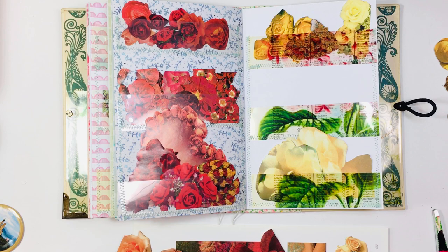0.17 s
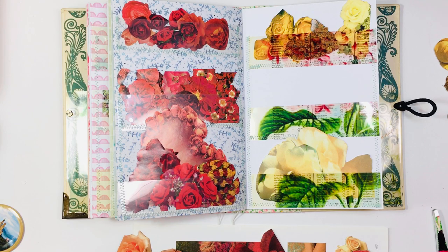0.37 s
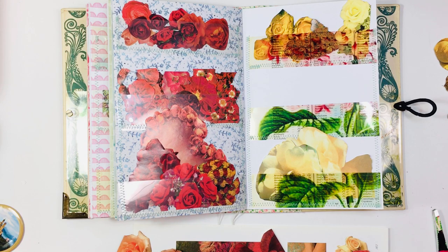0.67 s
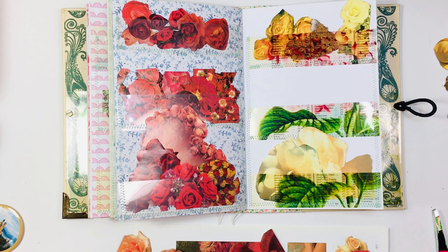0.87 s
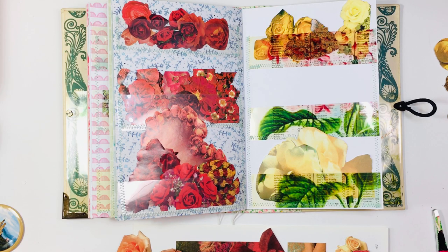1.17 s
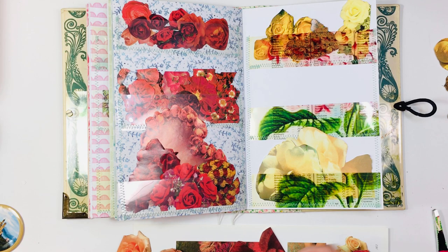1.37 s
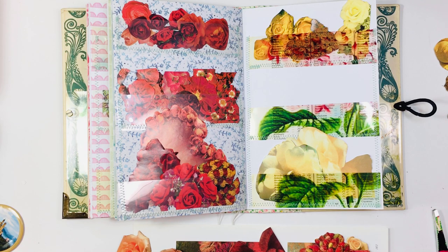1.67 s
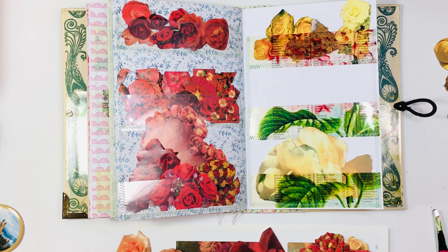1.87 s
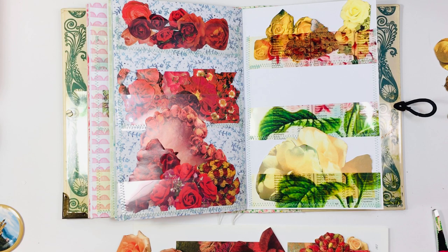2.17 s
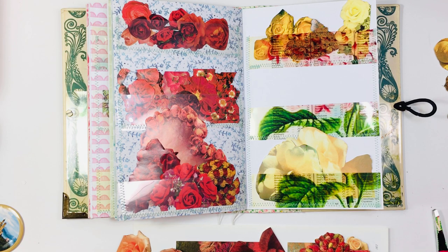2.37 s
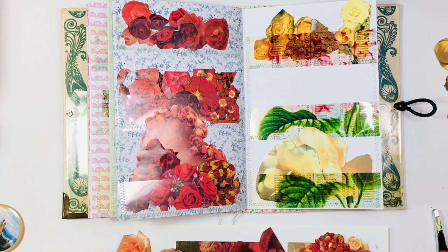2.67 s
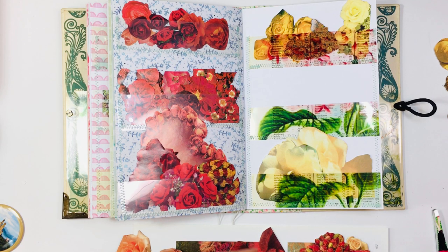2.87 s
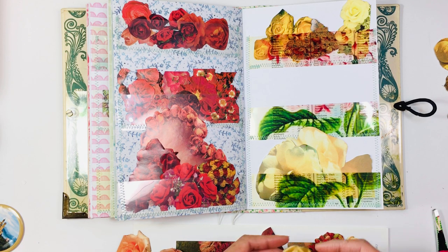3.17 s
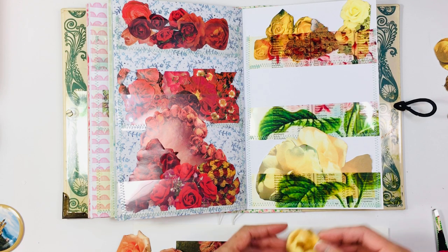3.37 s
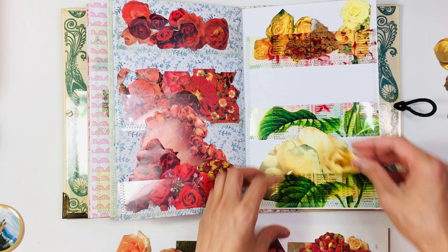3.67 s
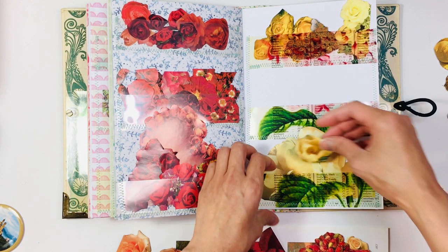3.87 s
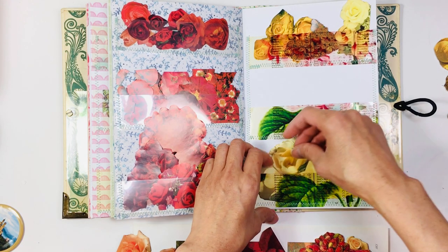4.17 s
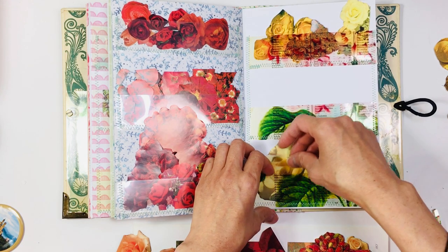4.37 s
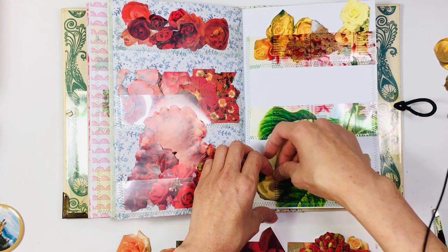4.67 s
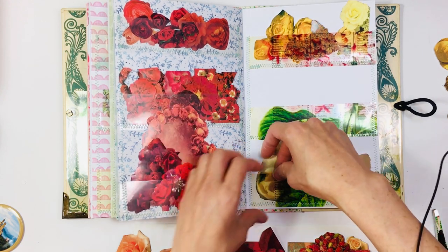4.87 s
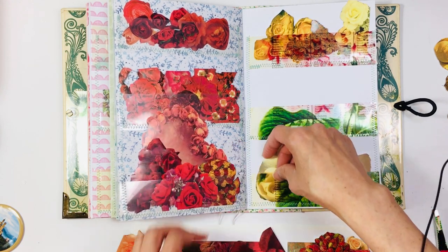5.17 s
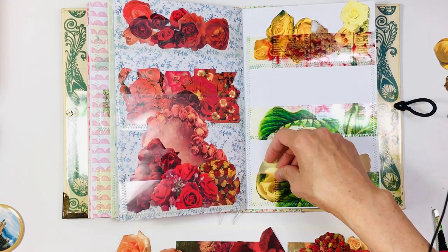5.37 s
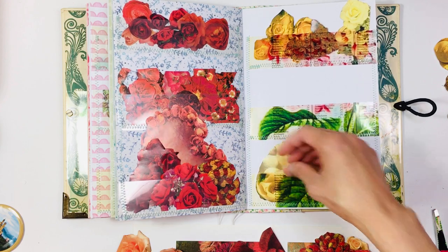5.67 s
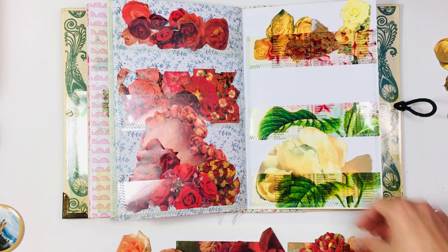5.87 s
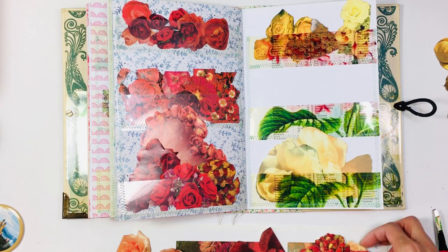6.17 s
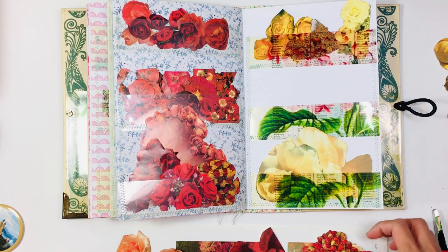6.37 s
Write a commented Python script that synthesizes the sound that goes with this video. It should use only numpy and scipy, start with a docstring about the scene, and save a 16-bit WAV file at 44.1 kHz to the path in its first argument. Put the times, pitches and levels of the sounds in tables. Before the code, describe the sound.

Close, dry rustling of thin paper sliding in short strokes, small sharp ticks, soft finger rubs and a plastic snap over faint low hum.

```python
"""Sliding paper hisses in fine grains close to the microphone: cut-outs glide over a table and into a clear pocket.
Each push shapes a shower of tiny random clicks over smooth noise; rubbing fingers are darker noise of the same kind.
Short noise bursts make scuffs and rustles, single ticks make crackles, damped sine waves make taps and sharp rings,
and gliding bands of noise colour some slides and scuffs. The pocket snaps once, as a noise crack with ringing tones.
A quiet room rumbles and hums underneath: shaped noise and two wavering tones."""
import sys
import numpy as np
from scipy import signal
from scipy.fft import rfft, irfft
from scipy.io import wavfile
from scipy.ndimage import uniform_filter1d

SR = 44100
rng = np.random.default_rng(int(sys.argv[2]) if len(sys.argv) > 2 else 0)


def wrap_up_sound(samples):
    """Save the sound to the file named by the first command line argument, as 16-bit audio."""
    columns = np.atleast_2d(samples).T
    # keep every value between -1 and 1, then stretch to whole-number steps
    tamed = np.clip(columns, -1, 1)
    steps = np.round(tamed * 32767).astype(np.int16)
    wavfile.write(sys.argv[1], SR, steps)


N = 287001
TIME = np.arange(N) / SR  # seconds
HIT = 4096  # samples in one short sound


def undb(db):
    """Turn decibels into a gain."""
    return 10 ** (np.asarray(db) / 20)


def unit(x, length=None):
    """Scale to an average strength (rms) of 1, spreading the energy over the given number of samples."""
    return x / np.sqrt(np.sum(x ** 2) / (length or x.size) + 1e-30)


def curves(table):
    """Draw straight lines between the rows of a time table, one value per sample."""
    times, *columns = np.transpose(table)
    return [np.interp(TIME, times, column) for column in columns]


def add(out, start_s, x):
    """Mix a short sound in at its start time."""
    first = max(int(start_s * SR), 0)
    out[first:first + len(x)] += x[:len(out) - first]


def bins(n):
    """List the frequencies in an n-point spectrum, in Hz."""
    return np.maximum(np.arange(n // 2 + 1) * SR / n, 1)


def slope(points, n):
    """Join (Hz, dB) points with straight lines into a gain over frequency."""
    hz, db = np.transpose(points)
    return undb(np.interp(np.log(bins(n)), np.log(hz), db))


def resonances(modes, n):
    """Add up a few broad resonances, each a hump in the gain over frequency."""
    f = bins(n)
    power = 0
    for hz, width_hz, db in modes:
        detuning = (f * f - hz * hz) / (f * width_hz)
        power = power + undb(db) ** 2 / (1 + detuning ** 2)
    return np.sqrt(power)


def shape(x, gain):
    """Colour a sound by scaling each of its frequencies."""
    return irfft(rfft(x) * gain, len(x))


def strike(x, gain):
    """Colour a hit with no sound before its start, so that the attack stays sharp."""
    # folding the cepstrum forward gives the minimum-phase filter with this gain
    cepstrum = irfft(np.log(gain + 1e-9))
    cepstrum[1:len(x) // 2] *= 2
    cepstrum[len(x) // 2 + 1:] = 0
    return shape(x, np.exp(rfft(cepstrum)))


def walk(rate):
    """Wander smoothly at random with a spread near 1, drawing a new value rate times a second."""
    k = int(SR / rate)
    steps = np.repeat(rng.standard_normal(N // k + 1), k)
    smooth = uniform_filter1d(uniform_filter1d(steps, k), k)
    return 1.3 * smooth[:N]


def grains(n, rate, spread_db, smooth):
    """Let fibres catch and let go: tiny clicks of unequal size, rate per second, over a smooth hiss."""
    sizes = undb(spread_db * np.minimum(rng.exponential(size=n), 4)) * rng.standard_normal(n)
    clicks = sizes * (rng.random(n) < rate / SR)
    return unit(clicks) + smooth * rng.standard_normal(n)


def flex(x, patchy_db, size=384, order=7):
    """Bend the paper as it moves, so that its colour shifts in patches some hundred Hz wide."""
    spectrum = signal.stft(x, nperseg=size)[2]
    patches = rng.standard_normal(spectrum.shape)
    for _ in range(2):
        patches = uniform_filter1d(patches, size=5, axis=0)  # across pitch
        patches = uniform_filter1d(patches, order, axis=1)  # across time
    return signal.istft(spectrum * undb(patchy_db * unit(patches)), nperseg=size)[1][:len(x)]


def paper_colour(body_db, edge_db):
    """Colour a paper contact: pressing on the page adds body, a free edge adds top."""
    points = [(60, body_db - 36), (300, body_db + 3.0), (1000, body_db), (2700, 0), (6500, 0),
              (11000, edge_db), (16000, edge_db - 11.5)]
    return slope(points, HIT)


def ring(hz, t60, phase=0):
    """Ring one damped tone that falls by 60 dB in t60 seconds."""
    t = np.arange(HIT) / SR
    return np.sin(2 * np.pi * hz * t + phase) * np.exp(-np.log(1000) * t / t60)


def tick(body_db, edge_db, ring_db, ring_s=0.0024):
    """Buckle once with a tick, while the sheet around it shivers briefly as fading noise."""
    t = np.arange(HIT) / SR
    fade = np.exp(-t / ring_s) * (1 - np.exp(-t / 0.000055))
    push = undb(ring_db) * unit(rng.standard_normal(HIT) * fade, 0.82)
    push[0] += 1
    return unit(strike(push, paper_colour(body_db, edge_db)), SR // 250)


# the still room's noise: pitch_hz, level_db (dB per Hz)
ROOM_NOISE = [(4, -55), (11, -61.5), (23, -70), (35, -75), (55, -77), (78, -87.5), (118, -82), (170, -97),
              (380, -103), (750, -109), (1600, -115), (4000, -117), (11000, -120), (16000, -125)]
# the lower hum, drifting over time: time_s, pitch_hz, level_db (main tone, before wavering)
LOWER_HUM = [(0, 54.76, -75), (.5, 55.3, -63), (1.3, 55.7, -64), (1.6, 56.1, -69), (2.9, 57.8, -63),
             (3.6, 63.2, -70), (4.4, 66, -90)]
# the higher hum, drifting over time: time_s, pitch_hz, level_db (main tone, before wavering)
HIGHER_HUM = [(3.8, 87, -93), (4.15, 89.5, -68), (4.7, 97.3, -63.5), (5.3, 99, -64.5), (6.0, 100, -65.5),
              (6.5, 101.2, -68)]


def room_tone():
    """Rumble and hiss as shaped noise, under two hums that waver in pitch and level, each with its octave."""
    air = shape(rng.standard_normal(N), slope(ROOM_NOISE, N)) * np.sqrt(SR / 2)
    for table, octave_db in ((LOWER_HUM, -7), (HIGHER_HUM, -19)):
        hz, db = curves(table)
        phase = 2 * np.pi * np.cumsum(hz * (1 + 0.012 * walk(6))) / SR
        tone = np.sin(phase) + undb(octave_db) * np.sin(2 * phase)
        air = air + np.sqrt(2) * undb(db + 1.7 * walk(7.8)) * tone
    return air


def walls(x, wet_db=-23, t60=0.13):
    """Answer faintly from a small, well damped room: a fading noise tail that starts after 4 ms."""
    t = np.arange(SR // 3) / SR
    tail = rng.standard_normal(len(t)) * np.exp(-np.log(1000) * t / t60) * (t > .004)
    return x + undb(wet_db) * signal.fftconvolve(x, unit(tail, 1))[:N]


# short damped notes, for light taps and the ring inside a sharp crackle:
# start_s, pitch_hz, t60_s (time to fall 60 dB), level_db (before decay)
DAMPED_NOTES = [(1.2657, 2250, .012, -40), (1.2657, 7100, .004, -29), (2.0739, 60, .016, -32),
                (2.0745, 270, 0.021, -43), (2.075, 540, .02, -49), (2.075, 2110, 0.017, -50),
                (2.197, 780, .035, -51), (2.7038, 1850, .016, -48), (5.7348, 2040, .02, -56),
                (6.326, 865, .034, -51)]


def damped_notes():
    """Ring short damped notes: light taps, and the ring inside a sharp crackle."""
    out = np.zeros(N)
    for start_s, hz, t60_s, db in DAMPED_NOTES:
        add(out, start_s, undb(db) * ring(hz, t60_s))
    return out


SNAP_S, SNAP_DB = 4.6893, -29  # start in seconds; level of crack and ring together, averaged over 4 ms
# notes of the taut pocket film: pitch_hz, t60_s (time to fall 60 dB), level_db (against each other)
FILM_NOTES = [(2710, 0.016, -19), (4290, 0.015, -1.5), (4820, 0.019, -3.5), (5930, .018, -11),
              (7040, 0.02, -3.5), (7700, 0.025, -5), (8240, 0.02, -6), (9700, 0.021, -3),
              (11700, 0.0094, 1), (12500, 0.011, -1), (13500, .014, -12)]


def snap(crack_db=-4, crack_s=0.005):
    """Flip the pocket film over: a crack of fading noise while the film rings in its own notes."""
    out, t = np.zeros(N), np.arange(HIT) / SR
    film = 0
    for hz, t60_s, db in FILM_NOTES:
        film = film + undb(db) * ring(hz, t60_s, rng.uniform(0, 2 * np.pi))
    crack = strike(rng.standard_normal(HIT) * np.exp(-t / crack_s), paper_colour(body_db=-15, edge_db=2))
    both = unit(film) + undb(crack_db) * unit(crack)
    add(out, SNAP_S, undb(SNAP_DB) * unit(both, SR // 250))
    return out


# shiver after the tick of an ordinary crackle; the harder the buckle, the cleaner its tick
SHIVER_DB, ORDINARY_CRACKLE_DB, SHIVER_DB_PER_DB = 3, -56, -0.4
# single crackles of paper and film: start_s, level_db, body_db, edge_db (brightness)
CRACKLE_TICKS = [(0.039, -54, -22, 1), (0.3006, -57, -8, 3), (1.011, -54.5, -6, 1), (1.0962, -60, -4, -18),
                 (1.2653, -37.8, -19, -6), (1.2724, -43, -26, -2), (1.2748, -48, -20, 10),
                 (1.307, -56.5, -2, -12), (1.3285, -54, -14, -15), (1.478, -62, -10, -14),
                 (1.5458, -55.5, -7, -17), (1.8027, -67, -5, -22), (1.8454, -55, -8, -4),
                 (2.0743, -51.5, 6, -8), (2.334, -57, 2, 6), (2.5643, -55, 5, -3), (2.5795, -58, 7, -7),
                 (2.7033, -58, -2, -8), (2.9402, -47, -13, 0), (3.1501, -60, -9, -15), (3.7386, -59, 4, -9),
                 (4.137, -56.5, -12, -12), (4.1562, -51, 9, -2), (4.309, -55.5, 8, 3),
                 (5.0621, -62.5, 2, -7), (5.6382, -53, -9, 6), (5.7334, -52.5, -1, -1.5),
                 (6.004, -61.5, -31, -7), (6.0879, -57, -8, -5), (6.326, -40, -11.5, -7),
                 (6.3928, -61, -19, 3), (6.4113, -64.5, -14, -3)]


def crackles():
    """Buckle paper and film as they are picked up and pressed, one tick at a time."""
    out = np.zeros(N)
    for start_s, db, body_db, edge_db in CRACKLE_TICKS:
        shiver_db = SHIVER_DB + SHIVER_DB_PER_DB * (db - ORDINARY_CRACKLE_DB)
        add(out, start_s, undb(db) * tick(body_db, edge_db, shiver_db))
    return out


def swell(t, start, end):
    """Shape a noise burst that bites at once and lets go more gently."""
    place = (2 * t - start - end) / max(end - start, .005)  # -1 at start, 1 at end
    steepness = np.where(place < 0, 10, 3)
    return np.exp(-np.minimum(np.abs(place), 4) ** steepness)


# short noise bursts, for edge scuffs, the rustle in a crackle cluster and the shiver after the snap:
# start_s, end_s, level_db (before the swell), body_db, edge_db (brightness)
NOISE_BURSTS = [(1.011, 1.025, -58.5, 1, -6), (1.041, 1.055, -49.5, -6, -11),
                (1.217, 1.28, -52.5, -7.5, -2.5), (1.267, 1.277, -45, -20, -3),
                (1.547, 1.557, -56.5, 1, 11), (1.585, 1.599, -59.5, -17, -11),
                (2.021, 2.058, -49, -12, -4.5), (2.123, 2.152, -55.5, -20, -5),
                (2.946, 2.965, -54.5, -4, -1.5), (4.057, 4.092, -59, 7, -17), (4.135, 4.19, -58, 6, -2),
                (4.695, 4.724, -62, -10, -4), (4.893, 4.94, -65.5, -12, 5), (5.613, 5.645, -65, -2, 1),
                (5.88, 5.902, -65.5, 12.5, 9), (6.315, 6.35, -50, -3, -1.5)]
# resonances that colour every burst: pitch_hz, width_hz, height_db
BURST_RESONANCES = [(830, 820, 0), (2200, 2400, -1.5), (3280, 550, 2.5), (5400, 2800, 1.5), (7830, 1000, 7),
                    (10200, 1700, 3.5), (13300, 2000, 4.5)]


def noise_bursts():
    """Burst into dense grains: edge scuffs, the rustle in a crackle cluster, the shiver after the snap."""
    out, t = np.zeros(N), np.arange(HIT) / SR
    for start_s, end_s, db, body_db, edge_db in NOISE_BURSTS:
        slips = flex(grains(HIT, rate=2800, spread_db=0.0, smooth=0.86), patchy_db=2.5)
        colour = paper_colour(body_db, edge_db) * resonances(BURST_RESONANCES, HIT)
        burst = unit(shape(slips, colour))
        early_s = start_s - .01  # leaves room for the onset
        add(out, early_s, burst * swell(t + early_s, start_s, end_s) * undb(db))
    return out


# narrow bands of noise within slides and scuffs: start_s, end_s, first_hz, last_hz, level_db (at the middle)
GLIDING_BANDS = [(0.22, 0.43, 8900, 7300, -67), (1.319, 1.489, 3010, 2184, -71.5),
                 (1.439, 1.619, 3100, 2850, -73), (2.01, 2.06, 6200, 5700, -52),
                 (4.098, 4.655, 7050, 7100, -73), (4.408, 4.65, 5300, 4900, -68),
                 (4.885, 4.952, 5110, 4920, -68), (5.602, 5.659, 4700, 5000, -66)]


def gliding_bands(width_hz=380):
    """Glide narrow bands of noise in pitch within slides and scuffs: slow noise rides on a gliding tone."""
    out = np.zeros(N)
    low_pass = signal.butter(2, width_hz, fs=SR, output="sos")
    slow_noise = unit(signal.sosfilt(low_pass, rng.standard_normal(N)))
    for start_s, end_s, first_hz, last_hz, db in GLIDING_BANDS:
        hz = np.interp(TIME, (start_s, end_s), (first_hz, last_hz))
        phase = 2 * np.pi * np.cumsum(hz) / SR
        arch = np.sin(np.pi * np.clip((TIME - start_s) / (end_s - start_s), 0, 1))
        out += undb(db) * np.sqrt(2) * slow_noise * np.sin(phase) * arch
    return out


# faint crinkles of a moving sheet: how many, how strong against its hiss, how unequal
CRINKLES_PER_S, CRINKLE_DB, CRINKLE_SPREAD_DB = 31, -3, 2


def crinkles(gain):
    """Buckle a moving sheet slightly at random moments, more strongly the harder it is pushed."""
    sizes = undb(CRINKLE_DB + CRINKLE_SPREAD_DB * np.clip(rng.standard_normal(N), -2, 2))
    pulses = gain * sizes * (rng.random(N) < CRINKLES_PER_S / SR)
    return signal.fftconvolve(pulses, tick(body_db=-6.5, edge_db=-6.5, ring_db=1))[:N]


def gesture(start, end, attack_s, release_s):
    """Move a hand: it gathers speed up to start, holds until end and dies away."""
    rise = np.clip(1 + (TIME - start) / attack_s, 0, 1)
    return rise * np.exp(-np.clip((TIME - end) / release_s, 0, 20))


STROKE_ATTACK_S = 0.056
RUB_ATTACK_S, RUB_RELEASE_S, RESTING_HAND_DB = 0.17, 0.075, -86.5
SKIN_SIZZLE_DB = -9.5  # dry skin adds a little top, against the level of its rub
# pushes of a cut-out: up_to_speed_s, let_go_s, coast_s (fading time), hiss_db, sizzle_db (above the hiss)
PAPER_PUSHES = [(0.055, 0.115, 0.078, -66.5, 1), (0.108, 0.318, .115, -66, -.5),
                (0.897, 0.98, 0.049, -81, 0.5), (1.028, 1.089, .05, -68, -1),
                (1.125, 1.175, 0.05, -65.5, -1), (1.287, 1.369, 0.11, -63.5, -1.5),
                (1.863, 1.88, 0.041, -71.5, -6), (1.952, 1.98, .02, -68, -6), (2.04, 2.055, .008, -58, -7),
                (2.147, 2.195, .04, -62.3, -.5), (2.58, 2.677, 0.0073, -73.5, 2),
                (2.8, 2.974, 0.07, -75.5, -0.5), (3.177, 3.189, 0.033, -70.5, -9),
                (3.586, 3.78, 0.23, -74, 1.5), (4.042, 4.2, .03, -71.5, 1), (4.257, 4.32, 0.057, -67.5, -3),
                (4.395, 4.601, 0.031, -65.5, -4), (4.668, 5.037, .5, -78, -5.5),
                (6.16, 6.27, 0.1, -69.5, -1)]
# fingertips dragging over the page: pressed_s, lifted_s, level_db
FINGER_RUBS = [(1.04, 1.33, -77), (2.158, 2.633, -69.5), (3.6, 3.92, -78.3), (4.266, 4.5, -73),
               (5.0, 5.553, -81), (5.644, 5.837, -71.5)]


def effort():
    """Turn hand movements into gains for hiss, sizzle and finger rub; overlaps add in power."""
    hiss, sizzle, finger = 0, 0, undb(RESTING_HAND_DB) ** 2
    for start_s, end_s, coast_s, db, sizzle_db in PAPER_PUSHES:
        push = undb(db) * gesture(start_s, end_s, STROKE_ATTACK_S, coast_s)
        hiss = hiss + push ** 2
        sizzle = sizzle + (undb(sizzle_db) * push) ** 2
    for start_s, end_s, db in FINGER_RUBS:
        rub = undb(db) * gesture(start_s, end_s, RUB_ATTACK_S, RUB_RELEASE_S)
        finger = finger + rub ** 2
    sizzle = sizzle + finger * undb(SKIN_SIZZLE_DB) ** 2
    return np.sqrt([hiss, sizzle, finger])


POCKET_FROM_S, POCKET_TO_S = 3.4, 5.4
# resonances of a loose sheet, softened below: pitch_hz, width_hz, height_db
SHEET_RESONANCES = [(3220, 850, 1.5), (4860, 720, 1), (7700, 2300, -0.5), (10750, 1500, 3),
                    (12900, 1800, -3)]
# resonances of paper inside the pocket, softened below: pitch_hz, width_hz, height_db
POCKET_RESONANCES = [(2730, 1300, -1.5), (4360, 470, 2), (5300, 800, -1.5), (7040, 750, -0.5),
                     (9450, 1000, 0), (11600, 2400, 3)]
# colour of fingertips on the page: pitch_hz, level_db (against each other)
FINGER_COLOUR = [(100, -12), (260, 3.5), (480, -1.5), (760, 2.5), (1100, -4.5), (1600, -6.5), (3000, -10),
                 (8000, -40)]


def sliding():
    """Glide paper over the table and into the pocket as grainy friction noise, with fingertips rubbing."""
    hiss_gain, sizzle_gain, finger_gain = effort()
    inside = uniform_filter1d(1. * ((TIME > POCKET_FROM_S) & (TIME < POCKET_TO_S)), SR // 10)
    low = 1 / np.sqrt(1 + (bins(N) / 8500) ** 20)  # hiss below 8500 Hz, sizzle above
    high = np.sqrt(1 - low ** 2)
    stiff = 1 / np.sqrt(1 + (1200 / bins(N)) ** 4)  # thin paper radiates little bass
    paper = 0
    for modes, share in ((SHEET_RESONANCES, 1 - inside), (POCKET_RESONANCES, inside)):
        friction = grains(N, rate=1500, spread_db=2.5, smooth=1.0)
        friction = flex(friction, patchy_db=1.76, size=640, order=7)
        friction = shape(friction, resonances(modes, N) ** 0.84 * stiff)  # the power softens the peaks
        hiss = unit(shape(friction, low))
        sizzle = unit(shape(friction, high))
        paper = paper + share * (hiss_gain * hiss + sizzle_gain * sizzle)
    skin = flex(grains(N, rate=600, spread_db=2.0, smooth=1.0), patchy_db=3.5, size=1536, order=3)
    finger = unit(shape(skin, slope(FINGER_COLOUR, N)))
    # both flutter quickly and irregularly in level
    paper = paper * undb(1.2 * walk(70))
    finger = finger * finger_gain * undb(2.2 * walk(40))
    return paper + finger + crinkles(hiss_gain)


def scene():
    """Lay the hands' work, with its faint echo, over the room tone."""
    hands = sliding() + gliding_bands() + noise_bursts() + crackles() + damped_notes() + snap()
    return (walls(hands) + room_tone())[None]


TOP_HZ = 16150


def record(dry):
    """Cut the top steeply above TOP_HZ, as the recorder does."""
    top_cut = signal.ellip(10, .2, 70, TOP_HZ, fs=SR, output="sos")
    return signal.sosfilt(top_cut, dry)


dry = scene()
out = record(dry)
wrap_up_sound(out)
```